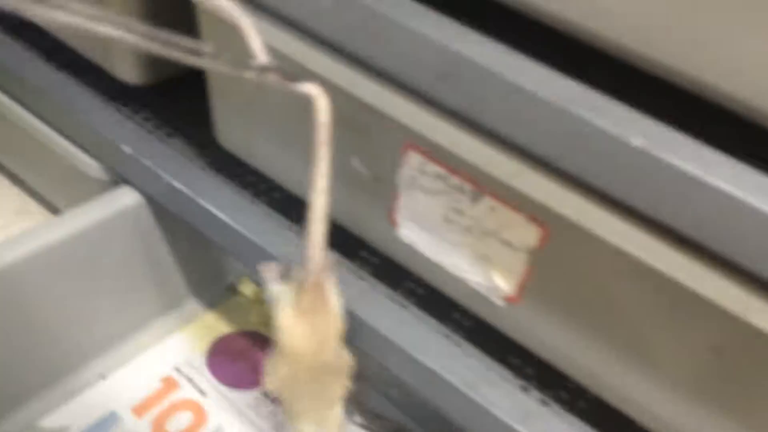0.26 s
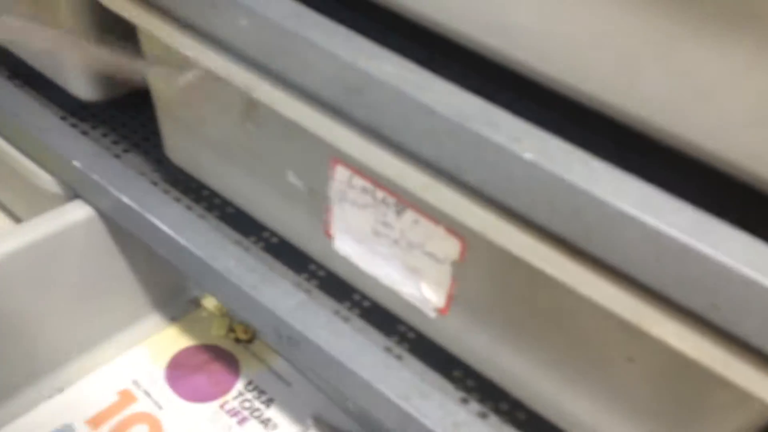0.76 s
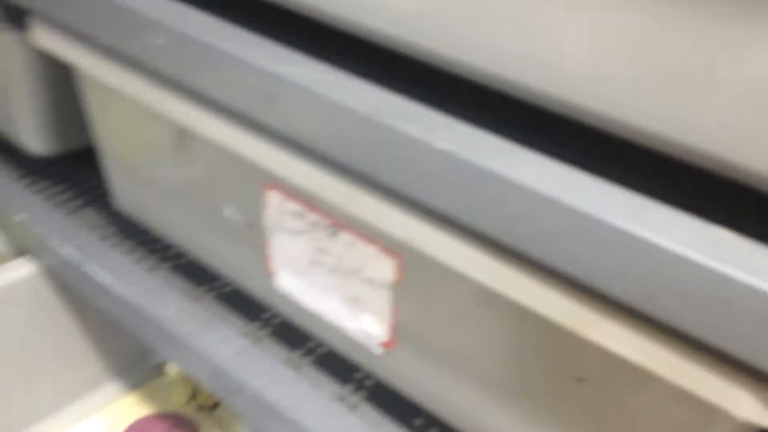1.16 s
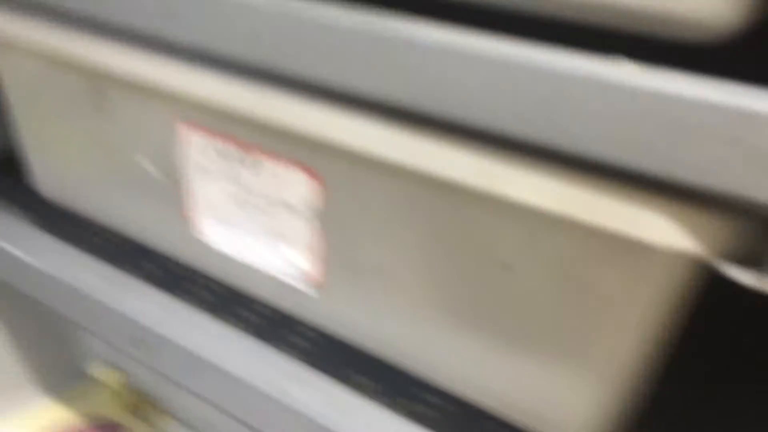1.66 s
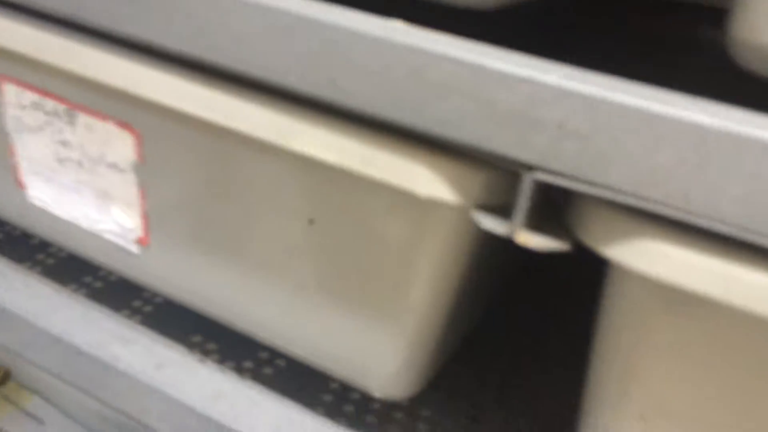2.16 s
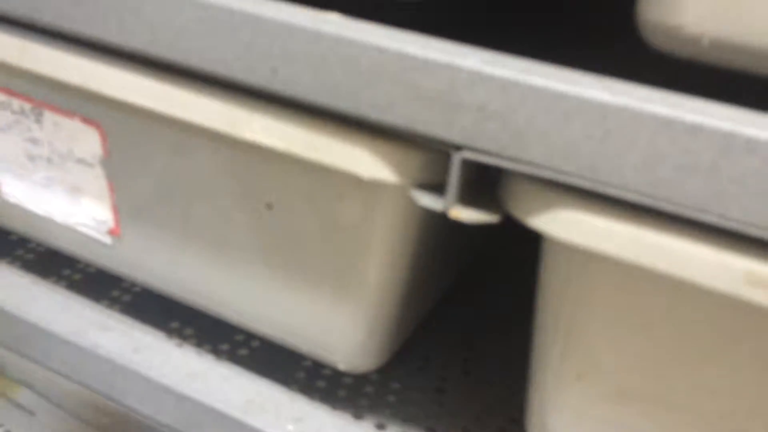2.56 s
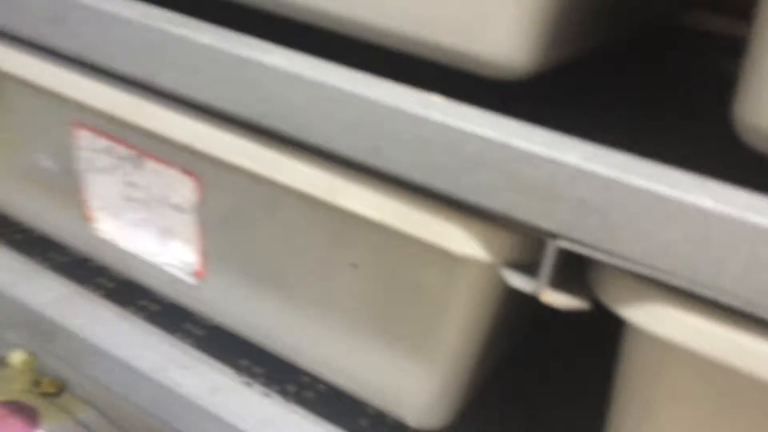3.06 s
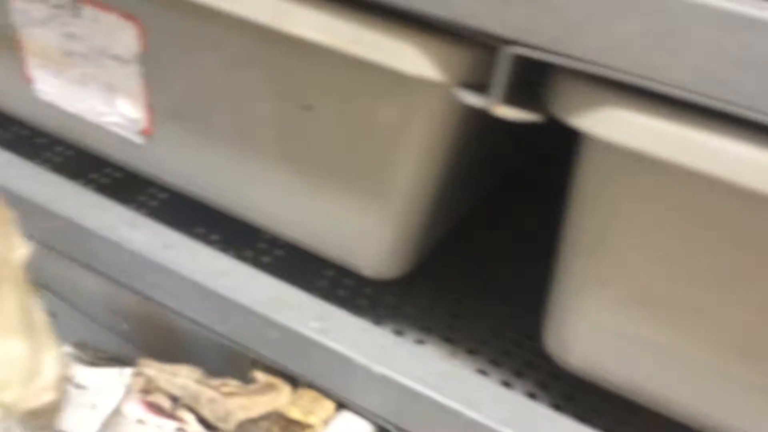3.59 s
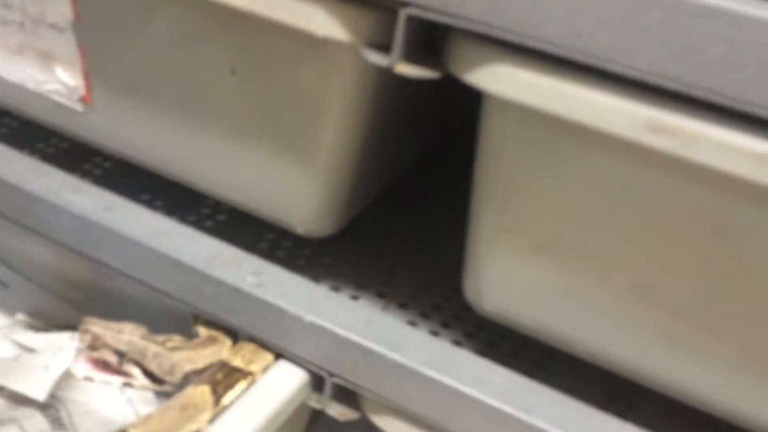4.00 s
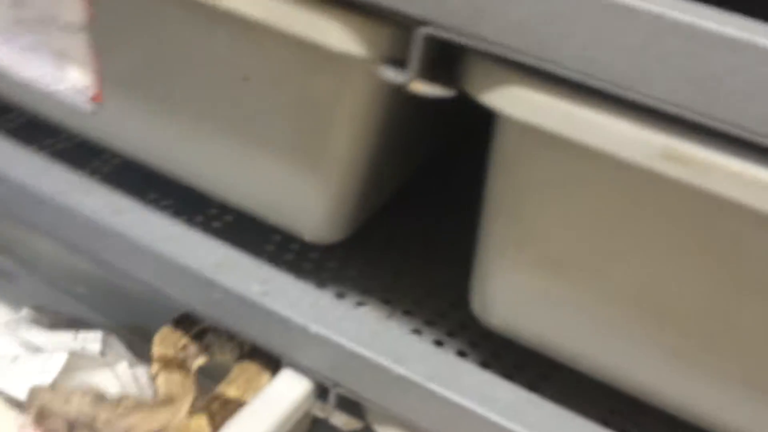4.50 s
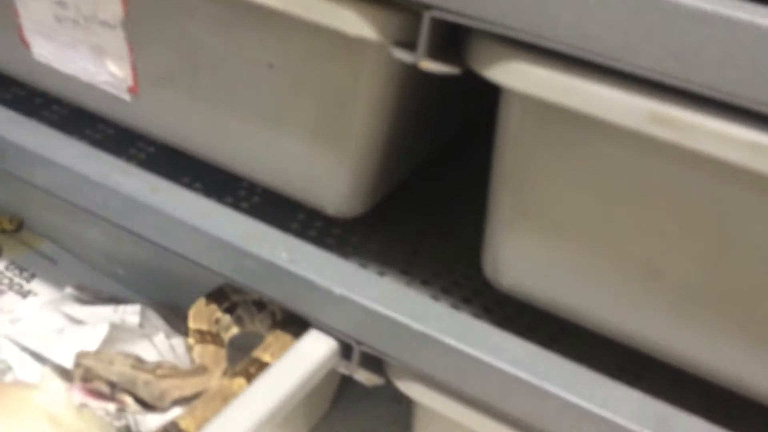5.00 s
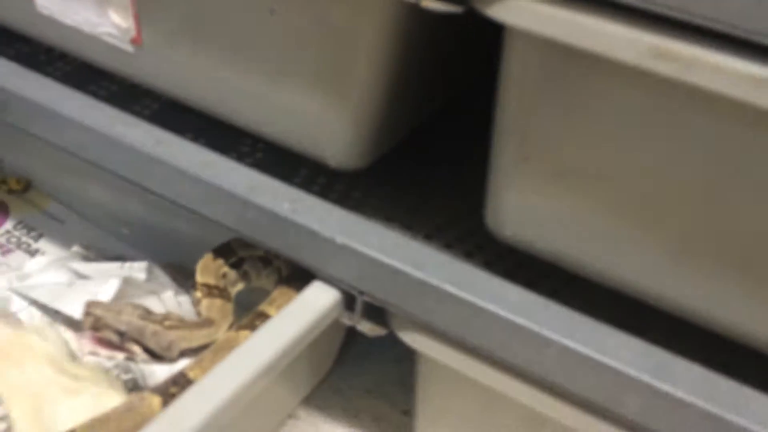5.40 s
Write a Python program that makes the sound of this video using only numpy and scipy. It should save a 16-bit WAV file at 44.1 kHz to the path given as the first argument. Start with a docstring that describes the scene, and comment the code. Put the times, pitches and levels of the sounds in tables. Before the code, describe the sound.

A snake hisses close to the microphone in a small room, fading within the first half second. At about 0.6 seconds steel tongs snap shut with a sharp clash and a brief high ring, striking the rim of a plastic tub. Quick clicks on plastic and crackles of paper bedding follow until 1 second, then thin to light ticks and soft rustling over a faint hiss. At about 2.8 seconds the snake starts a much louder, bright, breathy hiss that settles into a steady stream. The tub knocks dully around 3.1 seconds and more softly near 3.8. At 4.2 seconds the tongs snap again, with low bumps, a couple of clicks and a short paper crackle. The hiss surges again right afterwards, then sinks in tone and eases slowly until the end at about 5.6 seconds, with a few more dull knocks near 5.1. Faint low room noise lies underneath.

```python
"""Snake hissing at feeding tongs

A snake in an open plastic rack tub is offered food on steel tongs, close to a phone in a small room.
One hiss fades; the tongs snap, ring and scrape over plastic and paper while the snake hisses faintly.
Then a long hiss comes in two surges, with another snap just before the second. Each hiss is turbulent
breath; in the long hiss the throat resonance sinks after each surge. The tub takes a few dull knocks."""
import sys
import numpy as np
from scipy import signal
from scipy.fft import rfft, irfft
from scipy.io import wavfile
from scipy.ndimage import uniform_filter1d

SR = 44100
rng = np.random.default_rng(int(sys.argv[2]) if len(sys.argv) > 2 else 0)


def generate_wav(sig):
    """Save sig (samples, or channels by samples) to the path in sys.argv[1] as 16-bit PCM at SR."""
    pcm = np.round(np.clip(np.atleast_2d(sig).T, -1, 1) * 32767).astype(np.int16)
    wavfile.write(sys.argv[1], SR, pcm)


N = 249165
TIME = np.arange(N) / SR
HIT_TIME = TIME[:SR // 3]
WINDOW = 1024
BIN_HZ, FRAME_S, _ = signal.stft(TIME, SR, nperseg=WINDOW)

# Room tone. Each row: frequency in Hz, gain in dB.
ROOM_EQ = [(15, -20), (25, -15), (64, 10), (198, -1.5), (305, -8.5), (378, -5), (1140, -15), (1850, -24),
           (4870, -16), (6210, -6.5), (9550, -28), (12500, -14.5), (15500, -16)]
# Crackle of the paper bedding. Each row: frequency in Hz, gain in dB.
PAPER_EQ = [(88, -56), (150, -13), (193, -2.5), (239, -19.5), (404, -4.5), (519, -5.5), (618, -4),
            (2020, -4), (2230, -5), (2810, -4), (8490, -13.5), (15500, -29)]
# Shuffles over the paper. Each row: start in seconds, seconds until the fade, relative level in dB.
SHUFFLES = [(-.02, 0.57, -49.5), (0.658, 0.22, -51.5), (0.837, .1, -42), (0.966, 0.086, -48),
            (1.076, .24, -55), (1.347, 0.38, -64.5), (1.65, .025, -57.5), (1.819, 0.036, -56),
            (2, .53, -59.5), (2.608, 0.12, -62.5), (4.279, 0.029, -38.5), (4.338, .085, -41.5)]
# Modes of the tub's walls. Each row: frequency in Hz, level in dB.
TUB_MODES = [(72, -5), (97, -1.5), (130, 3.5), (165, -2.5), (200, 3.5), (267, -1.5), (330, -8.5),
             (374, -2.5), (560, -3), (700, -8), (860, -2), (1030, -2.5), (1220, -4.5)]
# Thud of the rack shelf. Each row: frequency in Hz, gain in dB.
SHELF_EQ = [(30, -24), (70, 0), (110, 1), (220, -10), (600, -26), (2000, -48)]
# Dull knocks on the tub. Each row: start in seconds, peak in dB, centre pitch in Hz, t60 in seconds,
# chatter against the wall tone in dB.
TUB_KNOCKS = [(0.029, -44.5, 370, 1, -2), (.261, -36.5, 1210, 0.029, -4), (0.7, -47, 168, .11, -22),
              (1.172, -46, 750, 0.045, -3), (1.291, -42, 800, 0.03, -1), (1.402, -49, 746, .042, 0),
              (1.688, -45.5, 169, .19, -7), (2.87, -40.5, 135, 0.62, -12), (3.071, -29, 450, 0.29, -1.5),
              (3.097, -18.5, 250, 0.12, -3.5), (3.134, -34, 125, .22, 4), (3.757, -29.5, 540, .14, 0),
              (4.252, -25.5, 146, 0.48, -6), (4.296, -31.5, 123, .51, 2), (5.122, -21.5, 300, 0.16, -5),
              (5.178, -28.5, 343, 0.13, 1.5), (5.205, -35.5, 292, 0.41, -7)]
# Tick of the plastic. Each row: frequency in Hz, gain in dB.
PLASTIC_EQ = [(100, -22.5), (600, -13.5), (1200, -4), (1800, 1.5), (2300, -1), (2870, -0.5), (3600, -4),
              (4330, -1), (6000, -3), (8400, -4), (11000, -8.5), (15500, -17)]
# Tongs touching plastic and paper. Each row: start in seconds, relative peak in dB,
# relative treble in dB, pitch of the spot in Hz.
TONG_TICKS = [(.26, -32, -26, 1320), (.309, -28, -3, 3350), (.357, -19.5, -6, 2804), (.638, -22.5, 1, 2500),
              (.676, -21, -7, 4600), (.681, -17.5, -11, 3360), (.699, -14.5, -14, 2600),
              (.717, -37, -16, 2420), (.772, -15.5, -10, 1890), (.83, -27, -9, 1850),
              (.851, -24, -22, 2000), (.861, -23.5, -9, 3650), (.867, -21.5, -17, 2060),
              (.893, -23, -10, 1400), (.909, -19, -8.5, 2450), (1.161, -31, -1.5, 3990),
              (1.469, -37.5, -19, 1210), (1.653, -26, -7, 2040), (1.872, -40.5, -10, 3100),
              (1.969, -43, -17, 2920), (2.129, -34.5, -12, 3500), (2.147, -38, -1, 2400),
              (2.179, -38, -24, 2190), (2.26, -40.5, -18, 2430), (2.371, -34.5, -10, 2040),
              (2.419, -32, -11, 2040), (2.707, -39.5, -11, 2920), (4.348, -16, -5, 3540),
              (4.38, -17.5, -16, 3300)]
# Ring of the steel arms. Each row: frequency in Hz, level in dB, t60 in seconds.
STEEL_MODES = [(6320, -8, 0.28), (7106, 0, 0.26), (7806, -3, 0.27), (8177, -3, 0.16), (9022, -2, 0.19),
               (9426, -4, 0.17), (10230, -9, 0.49)]
# Clash of the jaws. Each row: frequency in Hz, gain in dB.
CLASH_EQ = [(500, -46), (1000, -19), (2300, -10.5), (3400, -17.5), (4400, -3.5), (5200, -9), (6500, -4.5),
            (7200, 1.5), (8300, -1.5), (10700, -3.5), (12300, -8), (15500, -7.5)]
# Steel landing on the tub's rim. Each row: frequency in Hz, gain in dB.
RIM_EQ = [(40, -1), (130, 3.5), (450, 2.5), (900, -1), (2500, 0.5), (6000, 0.5), (15000, -12)]
# Tongs snapping shut. Each row: start in seconds, clash peak in dB, then ring and rim blow,
# both in dB against the clash.
TONG_SNAPS = [(.6078, -12.5, -17, 0.5), (4.187, -14.5, -22, -28)]
# Turbulence at the glottis. Each row: frequency in Hz, gain in dB.
GLOTTIS_EQ = [(60, 0.5), (200, -8.5), (700, -2), (1250, -8), (2200, 3.5), (3300, 0.5), (4100, 0.5),
              (5200, 0), (7000, 2), (8600, 1.5), (11200, 2.5), (13000, 3), (15500, -1.5)]
# Peaks and notches of the air in the open tub. Each row: frequency in Hz, width in Hz, lift in dB.
TUB_AIR = [(340, 96, 11), (480, 150, 0.5), (740, 100, 3), (1026.4, 82, 17), (1225, 120, 0), (1393, 75, 14),
           (1620, 100, 0), (1830, 48, 7), (2630, 180, 3), (2860, 150, -2), (3130, 120, 6), (3466, 250, 4.5),
           (4000, 370, -3), (4570, 160, 1), (6540, 320, -4.5), (7820, 370, 2), (9700, 390, 2),
           (12000, 270, -0.5), (14800, 600, -2.5)]
# Glide of the throat resonance. Each row: time in seconds, frequency in Hz, lift in dB.
THROAT_GLIDE = [(0, 2180, 6), (.25, 2420, 2), (.5, 3370, 16.5), (1.4, 3900, 12), (2, 3150, -1),
                (2.78, 2880, 4.5), (2.87, 4120, 13.5), (2.93, 4200, 9.5), (3.03, 3950, 6),
                (3.3, 3760, 12.5), (3.48, 3420, 4.5), (3.65, 2700, 7), (4.17, 2730, 7.5), (4.46, 3680, 9.5),
                (5, 2610, 9), (5.65, 2200, 7.5)]
# The snake's pushes of air. Each row: start, rise and hold in seconds, level in dB, fade in dB a second,
# throat band against the treble in dB, middle resonance in Hz, its lift in dB, high resonance in Hz,
# its lift in dB.
BREATHS = [(-.03, 0.028, 0.1, -43, 52, -5.5, 6040, 10, 11500, 5.5),
           (0.421, .04, 0.036, -52.5, 190, 3.5, 5900, 7, 11500, -1),
           (.85, 0.069, 0.12, -53.5, 30, -4, 6260, 7, 12500, -5),
           (1.31, 0.13, 0.2, -60, 30, -17, 6300, 16, 13800, 12),
           (1.79, 0.027, 0.81, -60, 250, -10, 6230, 1, 12300, 3),
           (2.595, 0.04, 0.022, -56.5, 300, -9, 5100, 19, 12200, 4),
           (2.738, 0.057, .01, -54, 200, 3.5, 4280, -2, 14300, 4),
           (2.772, 0.1, .02, -31, 150, 0, 4370, 3.5, 14400, 6.5),
           (2.849, 0.087, 0.035, -30.5, 58, -4.5, 5850, 6.5, 11100, 10),
           (2.928, 0.15, 0.24, -34.5, 42, -2.5, 5630, 4.5, 10450, 6.5),
           (3.145, 0.21, 0.98, -41.5, 51, -3.5, 7300, 4, 9300, 4),
           (4.321, 0.037, 0.13, -32.5, 50, -2, 5250, 6, 10800, 7.5),
           (4.402, 0.3, 0.081, -40, 8.5, -2, 6140, 4.5, 9300, 3)]


def undb(db):
    return 10 ** (np.asarray(db) / 20)


def unit(x):
    """Scale to rms 1."""
    return x / np.sqrt(np.mean(x ** 2))


def eq_db(points, hz):
    """Gain in dB of an EQ curve at the given frequencies."""
    point_hz, db = np.transpose(points)
    return np.interp(np.log(hz + 1), np.log(point_hz), db)


def bell(hz, centre, width):
    """Shape of one resonance, 1 at its centre."""
    return 1 / (1 + (2 * (hz - centre) / width) ** 2)


def colour(x, points, size=4096):
    """Minimum-phase EQ, so nothing rings ahead of an attack."""
    cepstrum = irfft(np.log(undb(eq_db(points, np.fft.rfftfreq(size, 1 / SR)))))
    causal = np.r_[cepstrum[0], 2 * cepstrum[1:size // 2]]
    response = irfft(np.exp(rfft(causal, size)))
    return signal.fftconvolve(x, response)[:len(x)]


def fade(t60):
    """Decay of a hit, 60 dB down after t60 seconds."""
    return np.exp(-np.log(1000) * HIT_TIME / t60)


def burst(t60):
    """A decaying burst of white noise."""
    return rng.standard_normal(len(HIT_TIME)) * fade(t60)


def swell(age, rise_s, hold_s, fade_db_per_s):
    """Envelope of a movement: a smooth rise, a hold, then a fade."""
    rising = np.sin(np.pi / 2 * np.clip(age / rise_s, 0, 1)) ** 2
    return rising * undb(-fade_db_per_s * np.maximum(age - rise_s - hold_s, 0))


def peak(x, db):
    """Scale a hit so that its smoothed envelope peaks at the given level."""
    return x * undb(db) / np.sqrt(2 * uniform_filter1d(x ** 2, size=64).max())


def add(out, start_s, x):
    """Mix a hit into a track."""
    i = int(start_s * SR)
    out[i:i + len(x)] += x[:N - i]


def wander(rate_hz):
    """Smooth random modulation with rms 1."""
    step = int(SR / rate_hz)
    stairs = np.repeat(rng.standard_normal(N // step + 1), step)
    return unit(uniform_filter1d(stairs, step)[:N])


def room_tone(level_db=-61.5, waver_db=1):
    """A low, gently wavering bed of room noise."""
    return unit(colour(rng.standard_normal(N), ROOM_EQ)) * undb(level_db + waver_db * wander(3.88))


def rack_echo(x, near_db=-13, near_t60=0.018, far_db=-21, far_t60=0.47):
    """Quick reflections between the shelves, then the short tail of the room."""
    near = burst(near_t60) * (HIT_TIME > .002)
    far = burst(far_t60) * (HIT_TIME > .012)
    response = undb(near_db) * near / np.linalg.norm(near) + undb(far_db) * far / np.linalg.norm(far)
    return x + signal.fftconvolve(x, response)[:N]


def bedding(creases_per_s=8000, grain_db=3.5, patchy_db=1, gain_db=-1, rise_s=0.0087):
    """Paper creases give way in dense crackles of unequal size."""
    power = sum((undb(db) * swell(TIME - start, rise_s, length - rise_s, fade_db_per_s=136)) ** 2
                for start, length, db in SHUFFLES)
    sizes = undb(grain_db * np.minimum(rng.exponential(size=N), 4))
    creases = (rng.random(N) < creases_per_s / SR) * rng.standard_normal(N) * sizes
    return unit(colour(creases, PAPER_EQ)) * np.sqrt(power) * undb(gain_db + patchy_db * wander(50))


def tub_knocks(spread_octaves=0.58, rise_s=0.0021, shelf_db=-9, chatter_stretch=1.6):
    """Soft blows wake the wall modes near one pitch; the tub chatters on its runners, the shelf thuds."""
    out = np.zeros(N)
    attack = 1 - np.exp(-HIT_TIME / rise_s)
    for start, db, centre_hz, t60, chatter_db in TUB_KNOCKS:
        modes = [(hz, mode_db - 10 * np.log10(1 + (np.log2(hz / centre_hz) / spread_octaves) ** 4))
                 for hz, mode_db in TUB_MODES]
        walls = sum((-1) ** k * undb(mode_db) * np.sin(2 * np.pi * hz * rng.normal(1, 0.017) * HIT_TIME)
                    for k, (hz, mode_db) in enumerate(modes))
        chatter = colour(burst(t60 * chatter_stretch), [(30, -35), *modes, (2200, -55)])
        # the lower the blow, the more of it reaches the shelf
        thud = undb(shelf_db) * min(300 / centre_hz, 1) * unit(colour(burst(t60), SHELF_EQ))
        knock = unit(walls * fade(t60)) + undb(chatter_db) * unit(chatter) + thud
        add(out, start, peak(knock * attack, db))
    return out


def small_taps(taps_per_s=10, lift_db=12, scatter_db=5, treble_db=-8, usual_hz=2480):
    """Chance contacts during the shuffles, as rows like those of TONG_TICKS."""
    rows = []
    for start, length, db in SHUFFLES:
        for when, size, octaves in rng.uniform(-0.83, 1, (round(taps_per_s * length), 3)):
            tap_s = max(start + length * (when + 1) / 2, 0)
            rows.append((tap_s, db + lift_db + scatter_db * size, treble_db, usual_hz * 2 ** octaves))
    return rows


def tong_ticks(gain_db=-5, rise_s=.0009, t60=0.019, tail_db=-24, tail_t60=0.27, bright_db=5, spot_db=6):
    """Short contacts ring the plastic, each spot with its own pitch and brightness."""
    out = np.zeros(N)
    attack = 1 - np.exp(-HIT_TIME / rise_s)
    for start, db, treble_db, hz in [*TONG_TICKS, *small_taps()]:
        contact = (burst(t60) + undb(tail_db) * burst(tail_t60)) * attack
        hardness = [(3500, 0), (8000, treble_db + bright_db)]
        spot = [(hz / 1.27, 0), (hz, spot_db), (hz * 1.35, 0)]
        tick = colour(colour(colour(contact, PLASTIC_EQ), hardness), spot)
        add(out, start, peak(tick, db + gain_db))
    return out


def tong_snaps(clash_t60=0.038, blow_t60=0.00027, rebound_s=0.000813, shimmer_db=-17, shimmer_t60=0.27):
    """The steel jaws clash, shimmer and ring; a tip lands on the tub's rim and rebounds twice."""
    out = np.zeros(N)
    ring = sum(undb(db) * fade(t60) * np.sin(2 * np.pi * (hz * HIT_TIME + rng.random()))
               for hz, db, t60 in STEEL_MODES)
    for start, db, ring_db, blow_db in TONG_SNAPS:
        clash = colour(burst(clash_t60) + undb(shimmer_db) * burst(shimmer_t60), CLASH_EQ)
        add(out, start, peak(clash, db) + peak(ring, db + ring_db))
        blow = peak(colour(-fade(blow_t60), RIM_EQ), db + blow_db)
        add(out, start, blow)
        add(out, start + rebound_s, 1.17 * blow)
        add(out, start + 3 * rebound_s, 0.57 * blow)
    return out


def band_rms(gain, lo_hz, hi_hz):
    """Level of white noise in one band after the given gains, frame by frame."""
    return np.sqrt(np.sum(gain[(BIN_HZ > lo_hz) & (BIN_HZ < hi_hz)] ** 2, axis=0) / len(BIN_HZ))


def wall_comb(hz, lag_s=.0017, drift=0.036, depth_db=3.0):
    """A reflection off the tub wall combs the treble; the comb shifts as the head sways."""
    lag = lag_s * (1 + drift * np.interp(FRAME_S, TIME, wander(1.864)))
    return depth_db * np.cos(2 * np.pi * hz * lag) * np.minimum(hz / 4000, 1) ** 2


def airflow():
    """Level in dB of all breaths together, then their five tone settings, blended by power."""
    powers, tones = [], []
    for start, rise, hold, db, fade_rate, *tone in BREATHS:
        force = swell(FRAME_S - start, rise, hold, fade_rate) + 1e-5
        powers.append((force * undb(db)) ** 2)
        tones.append(np.array(tone)[:, None])
    total = sum(powers)
    blend = sum(power * tone for power, tone in zip(powers, tones)) / total
    return 10 * np.log10(total), *blend


def snake_hiss(flutter_db=.5, tremble=0.029, soft_db=-43, bass_cut_per_db=0.38):
    """Glottal turbulence through three gliding airway resonances and the steady ones of the tub."""
    level_db, share_db, middle_hz, middle_db, high_hz, high_db = airflow()
    glide_s, glide_hz, glide_db = np.transpose(THROAT_GLIDE)
    quiver = 1 + tremble * np.interp(FRAME_S, TIME, wander(17))  # the throat never holds quite still
    throat_hz = np.interp(FRAME_S, glide_s, glide_hz) * quiver
    throat_db = np.interp(FRAME_S, glide_s, glide_db)
    hz = BIN_HZ[:, None]
    airway_db = (throat_db * bell(hz, throat_hz, width=1000)
                 + middle_db * bell(hz, middle_hz, width=1400)
                 + high_db * bell(hz, high_hz, width=2200))
    tub_db = sum(lift * bell(hz, centre, width) for centre, width, lift in TUB_AIR)
    gain = undb(eq_db(GLOTTIS_EQ, hz) + airway_db + tub_db + wall_comb(hz))
    # the flow sets the treble; the opening of the throat sets how much low band joins it
    gain /= band_rms(gain, 5000, 15000)
    low_band = 1 / (1 + (hz / 4900) ** 8)
    gain *= (undb(share_db) / band_rms(gain, 2000, 4500)) ** low_band
    # a hard breath is brighter: the bass grows more slowly than the rest
    effort_db = np.clip(level_db - soft_db, -5, 20)
    gain *= undb(-bass_cut_per_db * effort_db / (1 + (hz / 1900) ** 4))
    turbulence = signal.stft(rng.standard_normal(N), nperseg=WINDOW)[2]
    hiss = signal.istft(turbulence * gain * undb(level_db), nperseg=WINDOW)[1][:N]
    return hiss * undb(flutter_db * wander(35))


def scene():
    """Everything reaches one microphone, alike in both channels."""
    sources = snake_hiss() + tong_snaps() + tong_ticks() + bedding() + tub_knocks()
    mono = rack_echo(sources) + room_tone()
    return np.array([mono, mono])


def record(dry, bottom_hz=45, top_hz=15500):
    """The phone cuts the deepest bass and the top."""
    low_cut = signal.butter(2, bottom_hz, "high", fs=SR, output="sos")
    high_cut = signal.ellip(12, .2, 70, top_hz, fs=SR, output="sos")
    return signal.sosfilt(high_cut, signal.sosfilt(low_cut, dry))


dry = scene()
out = record(dry)
generate_wav(out)
```